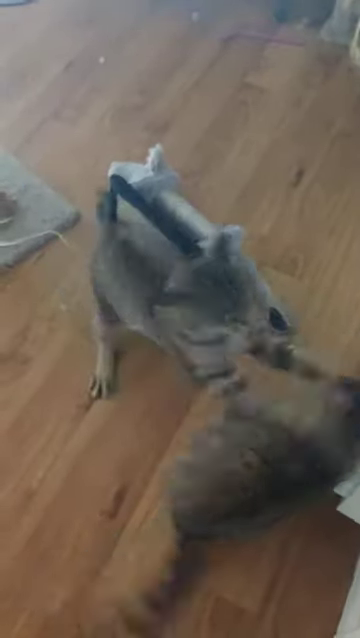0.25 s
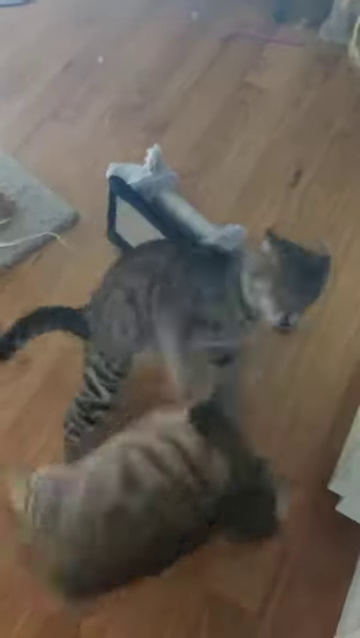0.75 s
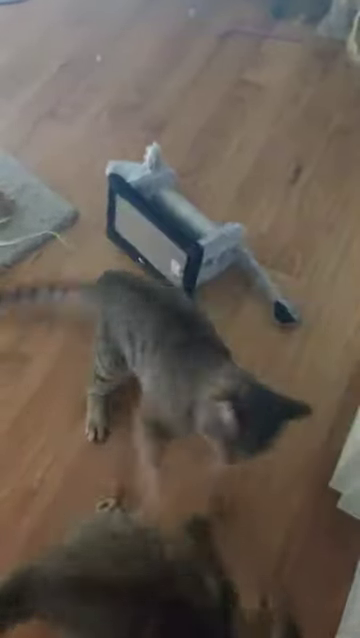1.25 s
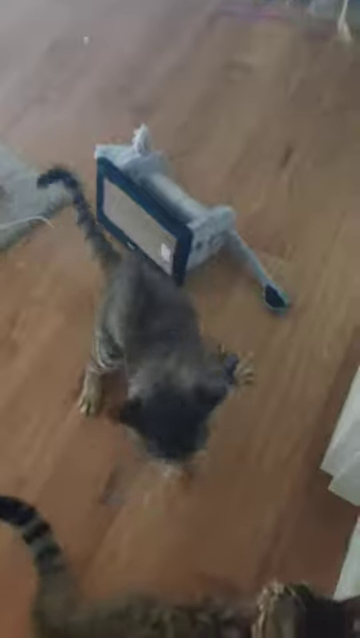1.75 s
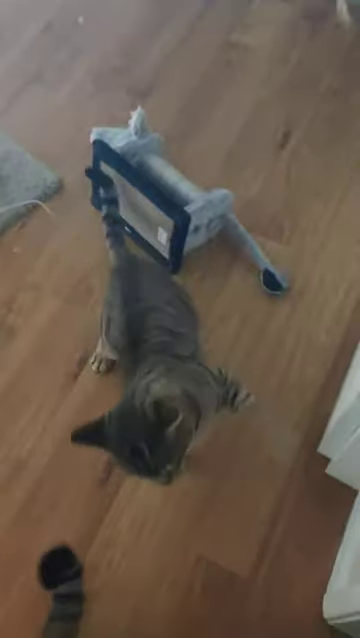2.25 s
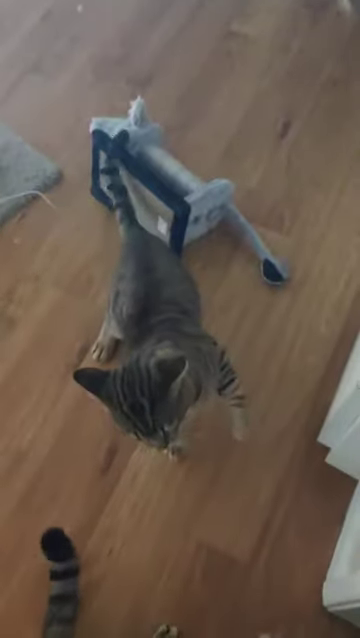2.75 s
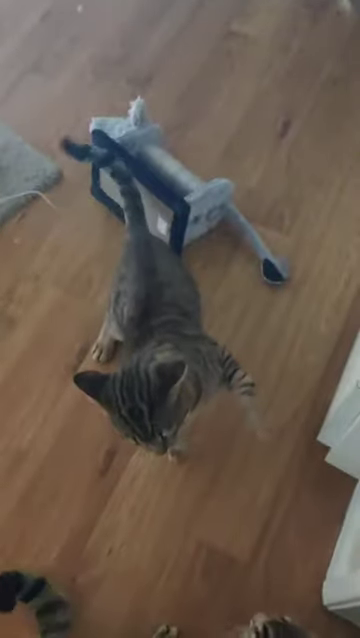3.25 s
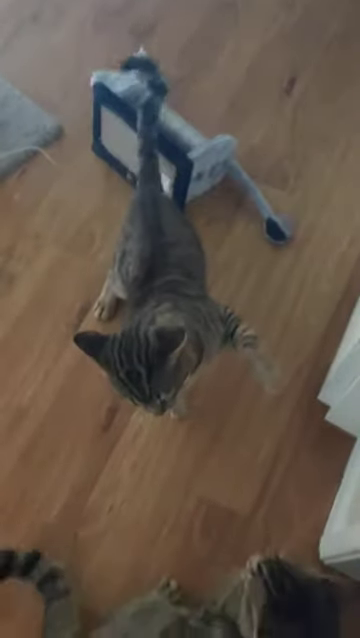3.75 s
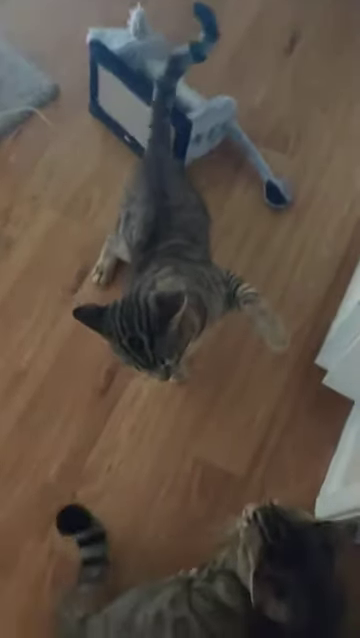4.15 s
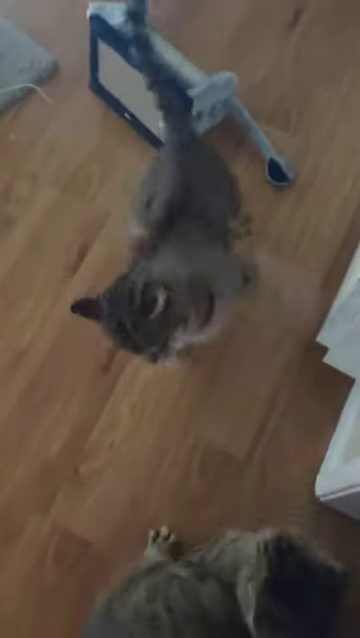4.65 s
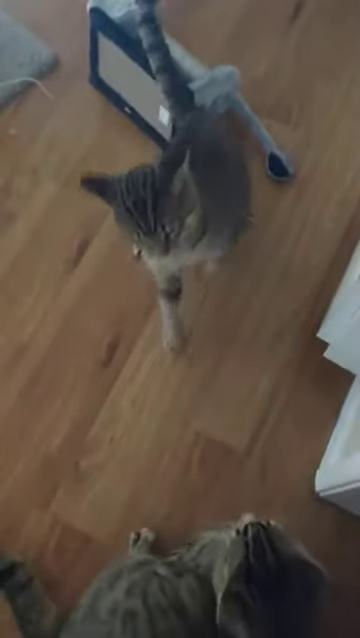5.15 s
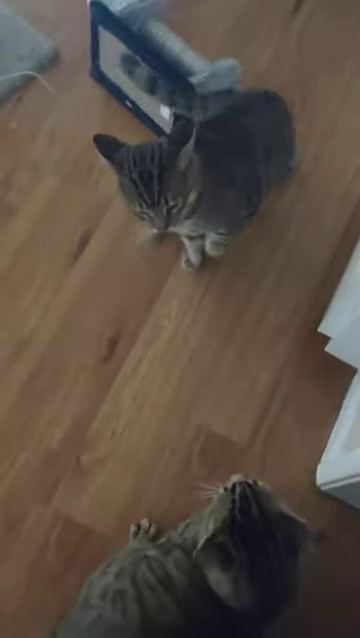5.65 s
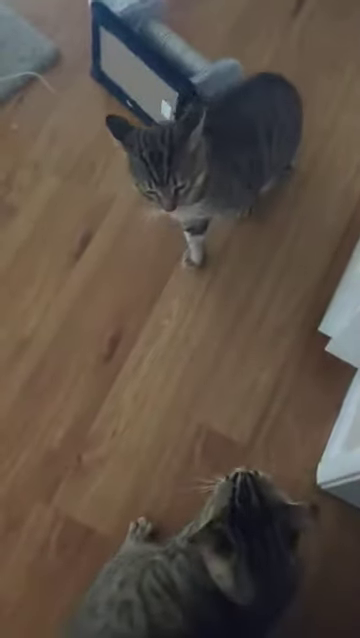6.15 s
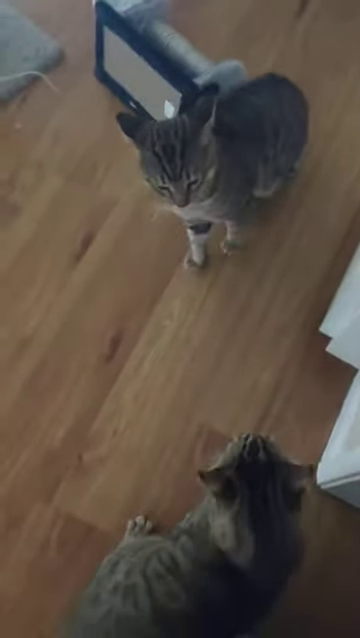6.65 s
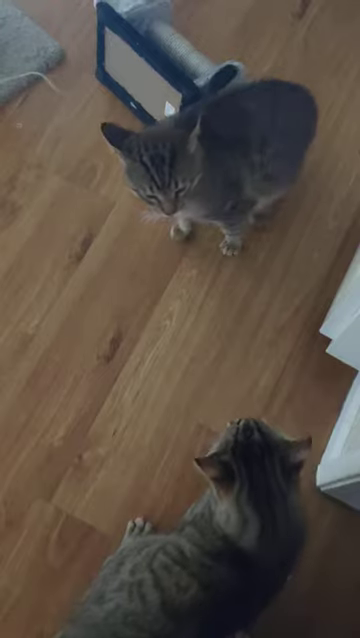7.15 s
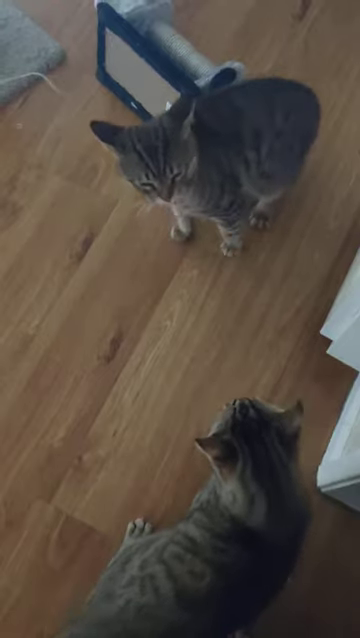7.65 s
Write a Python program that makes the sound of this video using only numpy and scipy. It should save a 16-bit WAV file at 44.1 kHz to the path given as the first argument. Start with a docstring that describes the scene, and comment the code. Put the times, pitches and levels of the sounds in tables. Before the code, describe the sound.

Two cats scuffle on a wooden floor with thumps and a hiss, then one lets out a long, wavering wail.

```python
"""Two cats face off

On a wooden floor in a live room, close up, a hoarse yowl ends in a scuffle: bodies thump down,
claws scrape, one cat hisses air past its teeth, paws swipe. One long wail follows and cracks upward
halfway, then come a few light taps and a soft swelling hiss. Both cries are vocal folds sounding
through the throat and a moving mouth. Quiet room air and a faint motor hum lie underneath."""
import sys
import numpy as np
from scipy import signal
from scipy.fft import rfft, irfft, next_fast_len
from scipy.io import wavfile
from scipy.ndimage import uniform_filter1d

SR = 44100
rng = np.random.default_rng(int(sys.argv[2]) if len(sys.argv) > 2 else 0)


def transcribe(signal):
    """Save signal, clipped to [-1, 1], as a 16-bit WAV file at the path in sys.argv[1]."""
    frames = np.atleast_2d(signal).T
    limited = np.clip(frames, -1, 1)
    pcm = np.round(limited * 32767).astype(np.int16)
    wavfile.write(sys.argv[1], SR, pcm)


N = 347949
TIME = np.arange(N) / SR

# the room's ring: freq_hz, t60_s
ROOM_DECAY = [(100, 0.51), (1200, 0.57), (5000, 0.6), (15000, 0.46)]
# echoes off floor and furniture: left_delay_s, right_delay_s, gain
ECHOES = [(.0013, 0.001602, 0.29), (.0041, 0.0071, 0.039)]
# how alike left and right are: freq_hz, correlation
STEREO_LIKENESS = [(180, 0.87), (400, 0.78), (900, 0.0061), (2000, 0)]
# tone of the room's air: freq_hz, gain_db
AIR_SPECTRUM = [(25, -0.5), (60, -9.5), (150, -7.5), (500, -12), (900, -21), (1900, -31.5), (15500, -37.5)]
# a motor's hum once it has come up: pitch_hz, level_db
HUM_LINES = [(92, -59.5), (151, -65), (410, -61.5)]

# shoves of weight on the boards: start_s, length_s, level_db
SHOVES = [(0, 0.27, -43), (.28, 0.37, -29.5), (.6, 0.37, -37), (.89, .19, -32), (1.05, 0.53, -46),
          (3, 4.2, -49)]
# strokes of fur and claws sliding on the boards: start_s, length_s, level_db
SLIDES = [(.27, 0.4, -35.5), (.52, 0.15, -31.5), (1.23, 0.2, -41.5), (2.03, 0.3, -41.5), (2.56, 0.2, -54.5),
          (6.2, 0.15, -49.5)]
# bodies and paws landing: start_s, thud_db, knock_db, claw_db
LANDINGS = [(0.314, -65, -32.5, -52), (.328, -28, -14, -12.5), (.337, -12.5, -15, -35),
            (0.432, -19.5, -21.5, -28), (0.504, -29, -27, -38), (1.238, -34.5, -35, -53),
            (1.323, -49, -45, -27), (1.333, -45, -46, -47), (1.433, -58, -41, -49), (1.534, -48, -47, -68),
            (2.066, -45, -29.5, -40), (2.102, -69, -59, -33), (2.617, -70, -74, -46),
            (7.142, -51.5, -47.5, -50), (7.201, -52, -35.5, -56), (7.222, -54, -34, -48)]
# soft, heavy thumps of a body's weight: start_s, level_db
THUMPS = [(.503, -21), (1.276, -41.5), (1.495, -37.5)]
# sharp little snaps and claw ticks: start_s, level_db
SNAPS = [(.615, -21.5), (.781, -28), (2.013, -36.5), (2.035, -35), (2.044, -27.5), (2.074, -24.5),
         (2.389, -43), (2.616, -44), (4.644, -18.5), (4.898, -37), (4.947, -32)]
# a thump's dull boom, the floor's low ring, one board's woody ring: freq_hz, gain_db, t60_s
THUMP_MODES = [(42.2, -6, .12), (110, 1, 0.11)]
FLOOR_MODES = [(232, -1, 0.13), (300, -4, 0.19)]
BOARD_MODES = [(375, -18, 0.015), (774, 0.5, 0.019), (1381, 0.5, 0.041), (4180, -22, 0.091),
               (6880, -7, 0.026)]
# tone of each kind of contact: freq_hz, gain_db
RUMBLE_SPECTRUM = [(25, -8.5), (250, -10), (1200, -22), (4000, -61)]
SCRAPE_SPECTRUM = [(200, -7), (2000, -8.5), (4900, -1), (8000, -1), (10000, -10), (15500, -0.5)]
THUD_SPECTRUM = [(30, -21), (170, -4.5), (235, 8), (450, -12.5), (900, -41), (3000, -48)]
KNOCK_SPECTRUM = [(100, 0.5), (500, 2.5), (1100, -4.5), (2000, -6.5), (4200, -10), (15000, -29)]
CLAW_SPECTRUM = [(500, -13), (4500, 1.5), (7000, 1.5), (9500, -10.5), (12500, 0)]
SNAP_SPECTRUM = [(2000, -30.5), (4500, -2), (7000, -1), (10000, -7.5), (12500, 0)]

# envelopes of the soft hiss and the cat's hiss: time_s, level_db
SOFT_HISS_LEVEL = [(7.42, -69), (7.58, -53), (7.89, -39.5)]
HISS_LEVEL = [(.655, -40), (.678, -28), (.735, -26.5), (.77, -25.5), (.83, -23), (.9, -27.5), (.98, -27),
              (1.035, -39)]
# tone of the two hisses, the breath in a cry and the throat: freq_hz, gain_db
SOFT_HISS_SPECTRUM = [(200, -8), (580, 14), (900, 3), (1900, -2.5), (2500, 1.5), (7800, 1), (9500, -15),
                      (13000, 0.5)]
HISS_SPECTRUM = [(200, -5), (1400, -2.5), (2100, -6.5), (3300, 2), (4400, -1), (7000, -1.5), (9500, -6.5),
                 (12000, 0), (15500, -3)]
BREATH_SPECTRUM = [(300, -32), (1400, -4.5), (1950, -9), (2350, -4), (2800, -10), (3800, -14.5), (4800, -2),
                   (6300, -18.5), (9500, -31.5), (15000, -20.5)]
THROAT_SPECTRUM = [(280, -1.5), (600, -10), (850, 7), (1150, -2.5), (1750, -4.5), (2330, -2.5), (2820, -13),
                   (3650, -17), (4000, -24), (4850, -7), (5500, -14.0), (6050, -27.5), (6500, -36),
                   (8000, -30.5), (8800, -48.5), (15000, -42)]

# force and vowel of each cry; both resonances sink as the mouth rounds to an "oo":
# time_s, effort_db, mouth_hz, upper_hz, brightness_db
YOWL_VOWELS = [(0, -23, 1400, 2160, 1), (.06, -32.5, 1330, 2100, -7), (.17, -33, 1280, 1970, -4),
               (0.251, -39.5, 880, 1760, -31)]
WAIL_VOWELS = [(3.27, -27, 1090, 2540, 1.5), (3.42, -30, 1490, 2050, -5.5), (3.54, -24.5, 1700, 2710, -3),
               (3.73, -23, 1800, 2680, 0.5), (3.94, -21, 1825, 2740, 1), (4.01, -21.5, 1670, 2560, -2.5),
               (4.1, -22, 1620, 2700, 0), (4.26, -22, 1520, 2480, -4.5), (4.44, -24, 1380, 2470, 3.5),
               (4.59, -20, 1550, 2480, 0), (4.73, -19.5, 1184, 2400, -0.5), (4.9, -20.5, 1176, 2200, -6.5),
               (5.11, -20, 1275, 2160, -7.5), (5.18, -21, 1065, 1960, 4.5), (5.48, -22, 1060, 1910, 7),
               (5.72, -24, 1450, 2844, 4), (5.95, -21.5, 1300, 2600, 3.5), (6.09, -23, 920, 2440, 4)]
# the wail's slow melody: time_s, pitch_hz
WAIL_MELODY = [(3.21, 552), (3.26, 633.7), (3.43, 596.3), (3.5, 623.5), (3.78, 592.1), (4.05, 619.2),
               (4.52, 610.1), (4.61, 637.5), (4.76, 582.3), (4.95, 542.4), (5.57, 535.2), (5.78, 557.7),
               (5.99, 558), (6.11, 508.4)]
# the voice slips, turns raspy and settles back: peak_s, jump_hz, settle_s, added_roughness
WAIL_CRACKS = [(3.3, -82, 0.073, 0.31), (3.6, -37, .07, 0.32), (3.999, 16, 0.082, .62),
               (4.65, 154.5, 0.059, 0.35), (5.132, 9, .04, 0.17), (6.115, 55, 0.41, 0.6)]
# the wail reaches the two sides unevenly: freq_hz, right_minus_left_db
WAIL_BALANCE = [(600, 0.5), (1180, 4.5), (1750, -7.5), (2350, 2.5), (2750, 1), (3400, 3.5)]
CLEAR_ROUGHNESS = 0.045  # what is left in a clear, held voice, on a scale of 0-1


def amp(db):
    return 10 ** (np.asarray(db) / 20)


def unit_rms(x):
    return x / np.sqrt(np.mean(x ** 2) + 1e-20)


def at_hz(points, hz):
    """A table's value at any frequency, on a log axis."""
    points_hz, values = np.transpose(points)
    return np.interp(np.log(hz + 1), np.log(points_hz + 1), values)


def follow(rows, t):
    """Each column of a curve table at the times t."""
    times, *columns = np.transpose(rows)
    return [np.interp(t, times, column) for column in columns]


def envelope(rows):
    """A gain curve that opens at its first row and cuts off 20 ms after its last."""
    return amp(follow(rows, TIME)[0]) * (TIME >= rows[0][0]) * (TIME <= rows[-1][0] + .02)


def arches(rows):
    """A gain curve in which each push swells and dies in one arch, peaking a little early."""
    gain = np.zeros(N)
    for start_s, length_s, db in rows:
        progress = np.clip((TIME - start_s) / length_s, 0, 1)
        gain += amp(db) * abs(np.sin(np.pi * progress ** 0.86)) ** 1.1
    return gain


def colour(x, spectrum, size=4096):
    """Minimum-phase EQ of unit power gain."""
    log_gain = np.log(amp(at_hz(spectrum, abs(np.fft.fftfreq(size, 1 / SR)))))
    taps = np.fft.ifft(np.exp(np.conj(signal.hilbert(log_gain)))).real[:size // 2]
    return signal.oaconvolve(x, taps / np.linalg.norm(taps))[:len(x)]


def wander(t, rate_hz):
    """Smooth random modulation of unit size, rolling off around rate_hz."""
    size = next_fast_len(len(t))
    hz = np.fft.rfftfreq(size, 1 / SR)
    slow = rfft(rng.standard_normal(size)) / (1 + (hz / rate_hz) ** 2) ** 2
    return unit_rms(irfft(slow, size)[:len(t)])


def flutter_noise(spectrum, flutter_db, flutter_hz):
    """Coloured noise whose strength flutters."""
    noise = rng.standard_normal(N) * amp(flutter_db * wander(TIME, flutter_hz))
    return unit_rms(colour(noise, spectrum))


def noise_band(hz, width_hz):
    """Noise held in one resonance, which may move."""
    turns = np.cumsum(hz * np.ones(N)) / SR
    return unit_rms(wander(TIME, width_hz) * np.cos(2 * np.pi * turns))


def strike(times, levels_db, spectrum, rise_s, decay_s):
    """Brief noise bursts of contact force, coloured by the surface."""
    out, t = np.zeros(N), TIME[:SR // 5]
    shape = (1 - np.exp(-t / rise_s)) * np.exp(-t / decay_s)
    shape_rms = np.sqrt(np.mean(shape ** 2)) / shape.max()
    for start_s, db in zip(times, levels_db):
        burst = unit_rms(colour(shape * rng.standard_normal(len(t)), spectrum))
        slot = out[round(start_s * SR):][:len(t)]
        slot += amp(db) * shape_rms * burst[:len(slot)]
    return out


def ring(times, levels_db, modes):
    """Each blow sets off the same dying modes."""
    t, kicks = TIME[:SR // 2], np.zeros(N)
    kicks[np.round(times * SR).astype(int)] = amp(levels_db)
    response = sum(amp(db - 60 * t / t60) * np.sin(2 * np.pi * hz * t) for hz, db, t60 in modes)
    return signal.oaconvolve(kicks, response)[:N]


def narrow_bass(stereo):
    """Two unrelated channels become alike in the bass, as at two close points in a room."""
    left, right = rfft(stereo)
    size = stereo.shape[1]
    likeness = np.clip(at_hz(STEREO_LIKENESS, np.fft.rfftfreq(size, 1 / SR)), 0, 1)
    return irfft([left, likeness * left + np.sqrt(1 - likeness ** 2) * right], size)


def room(x, wet_db, right_db):
    """Direct sound, near echoes and a tail that dies band by band, panned right by right_db."""
    hz, t, bands = signal.stft(rng.standard_normal((2, SR)), SR, nperseg=256)
    decay = amp(-60 * t / at_hz(ROOM_DECAY, hz)[:, None])
    build_up = np.clip(t / 0.0053, 0, 1)
    tail = signal.istft(bands * decay * build_up, SR, nperseg=256)[1][:, :SR]
    response = amp(wet_db) * narrow_bass(tail / np.linalg.norm(tail[0]))
    response[[0, 1], [1, 0]] += 1  # direct sound, one sample later on the left
    for left_s, right_s, gain in ECHOES:
        response[[0, 1], [round(left_s * SR), round(right_s * SR)]] += gain
    response /= np.linalg.norm(response[0])
    pan = amp([[-right_db / 2], [right_db / 2]])
    return signal.fftconvolve(x[None], response, axes=1)[:, :N] * pan


def room_air(air_db=-51.5, whine_db=-67, whine_hz=2520, whine_width_hz=130):
    """A bed of low room noise with a faint narrow band of whine."""
    low = narrow_bass(np.array([colour(rng.standard_normal(N), AIR_SPECTRUM) for _ in range(2)]))
    detuning = (np.fft.rfftfreq(N, 1 / SR) - whine_hz) / whine_width_hz
    whine = irfft(rfft(rng.standard_normal((2, N))) / (1 + detuning ** 2), N)
    return amp(air_db) * unit_rms(low) + amp(whine_db) * unit_rms(whine)


def motor_hum(waver=0.64):
    """Faint motor tones that waver in level and come up toward the end."""
    tones = sum(amp(db) * (1 + waver * wander(TIME, 10)) * np.sqrt(2) * np.sin(2 * np.pi * hz * TIME)
                for hz, db in HUM_LINES)
    return tones * amp(np.interp(TIME, [5, 6], [-7, 0]))


def trampling():
    """Shoves of weight rumble the boards."""
    return arches(SHOVES) * flutter_noise(RUMBLE_SPECTRUM, flutter_db=3, flutter_hz=25)


def scrapes(catches_per_s=2500, spread_db=3):
    """Claws and fur catch and slip in many tiny grains."""
    grains = rng.standard_normal(N) * amp(spread_db * np.minimum(rng.exponential(1, N), 4))
    catches = rng.random(N) < catches_per_s / SR
    return arches(SLIDES) * unit_rms(colour(grains * catches, SCRAPE_SPECTRUM))


def landings():
    """Each landing booms the floor, knocks a board and clicks the claws."""
    times, thud_db, knock_db, claw_db = np.transpose(LANDINGS)
    thuds = strike(times, thud_db - 7, THUD_SPECTRUM, rise_s=0.002, decay_s=0.011)
    floor = ring(times, thud_db, FLOOR_MODES)
    knocks = strike(times, knock_db, KNOCK_SPECTRUM, rise_s=0.002, decay_s=0.0024)
    # a paw that lands with weight mutes the board; a light tap lets it ring
    muting_db = np.clip(1.7 * (thud_db + 50), 0, 10)
    board = ring(times, knock_db + 1 - muting_db, BOARD_MODES)
    claws = strike(times, claw_db, CLAW_SPECTRUM, rise_s=0.0012, decay_s=0.0074)
    return thuds + floor + knocks + board + claws


def body_thumps():
    """A body's weight comes down with a soft, dull boom."""
    return ring(*np.transpose(THUMPS), THUMP_MODES)


def claw_snaps():
    """Very short contacts give bright snaps and ticks."""
    return strike(*np.transpose(SNAPS), SNAP_SPECTRUM, rise_s=.0003, decay_s=.0012)


def soft_hiss():
    """A soft rush of noise swells at the end."""
    return envelope(SOFT_HISS_LEVEL) * flutter_noise(SOFT_HISS_SPECTRUM, flutter_db=1.5, flutter_hz=38.3)


def cat_hiss(gape_s=.16, teeth_db=-2, mouth_db=-3):
    """Air spits past the teeth in a high, falling band; as the jaw gapes, a hard push rings the mouth."""
    gain = envelope(HISS_LEVEL)
    gape = np.clip((TIME - HISS_LEVEL[0][0]) / gape_s, 0, 1)
    teeth = noise_band(hz=6850 - 1597 * gape, width_hz=1200) * (1 - gape ** 2)
    mouth = noise_band(hz=3455, width_hz=950) * gape * gain / gain.max()
    turbulence = flutter_noise(HISS_SPECTRUM, flutter_db=2.5, flutter_hz=70)
    return gain * (turbulence + amp(teeth_db) * teeth + amp(mouth_db) * mouth)


def cat_voice(t, pitch_hz, roughness, effort_db, mouth_hz, upper_hz, brightness_db, *,
              subharmonic_db, breath_db, jitter, mouth_db, upper_db, chest_db):
    """Vocal folds sound through the throat and two mouth resonances that move with jaw and tongue."""
    # strained folds lose their steady beat; even a held pitch wavers a little
    pitch_hz = pitch_hz * (1 + jitter * roughness * wander(t, 179.5) + .0035 * wander(t, 32))
    turns = np.cumsum(pitch_hz) / SR
    lips_shut = np.clip(1 - mouth_hz / 1050, 0, 1)
    voice = np.zeros(len(t))
    for harmonic in np.arange(1, 54) / 2:
        hz = harmonic * pitch_hz
        db = at_hz(THROAT_SPECTRUM, hz) + chest_db * (harmonic <= 1)
        db += mouth_db / (1 + ((hz - mouth_hz) / 300) ** 2)
        db += upper_db / (1 + ((hz - upper_hz) / 380) ** 2)
        db += brightness_db * np.clip((hz - 2600) / 1200, 0, 1)  # pressing harder lifts the top
        if harmonic in range(2, 10):  # in a rasp the strong overtones flutter, each in its own way
            db += 11 * (roughness - CLEAR_ROUGHNESS) * wander(t, 60)
        db -= 24 * lips_shut * np.log2(max(harmonic, 1))  # closing lips muffle the overtones
        # alternating strong and weak beats put partials halfway between the harmonics
        weight = amp(subharmonic_db) * roughness if harmonic % 1 else 1
        voice += weight * amp(db) * np.cos(2 * np.pi * harmonic * turns)
    voice /= np.sqrt(uniform_filter1d(voice ** 2, size=800))  # even out the level across vowels
    opening = 1 + np.cos(2 * np.pi * turns)  # air escapes in a puff each time the folds part
    puffs = unit_rms(colour(rng.standard_normal(len(t)) * opening, BREATH_SPECTRUM))
    shimmer = 1 + 0.35 * roughness * wander(t, 120)
    cry = voice * shimmer + amp(breath_db) * (0.44 + roughness) * puffs
    out = np.zeros(N)
    out[np.round(t * SR).astype(int)] = amp(effort_db) * cry * signal.windows.tukey(len(t), .01)
    return out


def hoarse_yowl(start_hz=618.5, sag_hz_per_s=305, roughness=0.55):
    """The end of a rough cry: the pitch sags while the mouth closes."""
    t = TIME[TIME <= YOWL_VOWELS[-1][0]]
    return cat_voice(t, start_hz - sag_hz_per_s * t, roughness, *follow(YOWL_VOWELS, t),
                     subharmonic_db=2, breath_db=-18, jitter=0.036,
                     mouth_db=23.5, upper_db=12, chest_db=11)


def long_wail(start_s=3.216, jaw_open_s=3.3, jaw_shut_s=6.125, end_s=6.205):
    """A held cry starts behind closed lips, opens, cracks now and then, and shuts to a short hum."""
    jaw_move_s, fade_in_s, slip_s, clearing_s = 0.039, 0.036, .026, 0.85
    shut_mouth_hz, shut_db, thinning_db_per_hz = 670, -8.5, 0.08
    t = TIME[(TIME >= start_s) & (TIME <= end_s)]
    pitch_hz, = follow(WAIL_MELODY, t)
    effort_db, mouth_hz, upper_hz, brightness_db = follow(WAIL_VOWELS, t)
    roughness = CLEAR_ROUGHNESS + .25 * np.exp(-(t - start_s) / clearing_s)  # husky at first
    for peak_s, jump_hz, settle_s, added_roughness in WAIL_CRACKS:
        slip = np.interp(t, [peak_s - slip_s, peak_s, peak_s + settle_s], [0, 1, 0])
        pitch_hz += jump_hz * slip
        roughness += added_roughness * slip
        effort_db -= thinning_db_per_hz * max(jump_hz, 0) * slip  # an upward crack thins the voice
    jaw = np.interp(t, [jaw_open_s - jaw_move_s, jaw_open_s, jaw_shut_s - jaw_move_s, jaw_shut_s],
                    [0, 1, 1, 0])
    onset = np.clip((t - start_s) / fade_in_s, 0, 1)
    effort_db += shut_db * (1 - jaw) + shut_db * (1 - onset)
    mouth_hz = shut_mouth_hz + jaw * (mouth_hz - shut_mouth_hz)
    return cat_voice(t, pitch_hz, roughness, effort_db, mouth_hz, upper_hz, brightness_db,
                     subharmonic_db=-38.5, breath_db=-20.5, jitter=0.026,
                     mouth_db=14, upper_db=11, chest_db=1)


def pan_wail(stereo):
    """Each band of the wail leans to one side."""
    right_db = at_hz(WAIL_BALANCE, np.fft.rfftfreq(N, 1 / SR))
    return irfft(rfft(stereo) * amp([-right_db / 2, right_db / 2]), N)


def scene():
    """Cries, hisses and scuffling, each sent through the room, over its quiet air and hum."""
    wail = long_wail()
    yowl = hoarse_yowl()
    hisses = cat_hiss() + soft_hiss()
    scuffle = scrapes() + trampling()
    impacts = landings() + body_thumps()
    snaps = claw_snaps()
    return (pan_wail(room(wail, wet_db=-0.5, right_db=0)) * amp(1)
            + room(yowl, wet_db=1, right_db=0.5)
            + room(hisses, wet_db=1.5, right_db=3)
            + room(scuffle, wet_db=2.5, right_db=1.1)
            + room(impacts, wet_db=1, right_db=1.5)
            + room(snaps, wet_db=-2.5, right_db=10)
            + room_air() + motor_hum())


def record(dry, cutoff_hz=15850):
    """A steep low-pass trims the very top of the mix."""
    lowpass = signal.firwin(511, cutoff_hz, window=("kaiser", 9), fs=SR)
    return signal.oaconvolve(dry, lowpass[None], "same")


dry = scene()
out = record(dry)
transcribe(out)
```